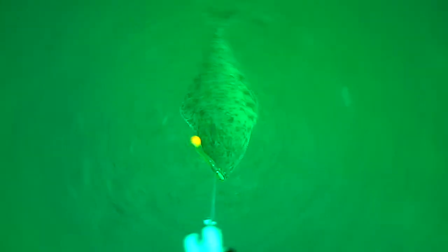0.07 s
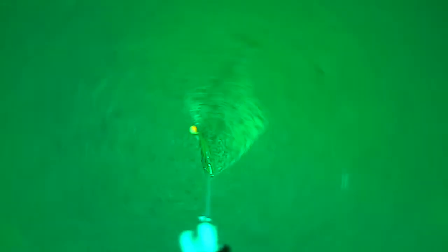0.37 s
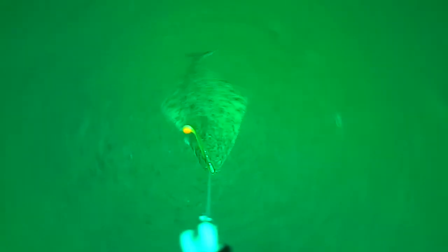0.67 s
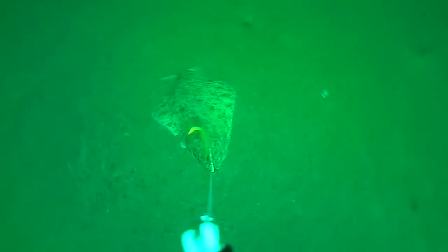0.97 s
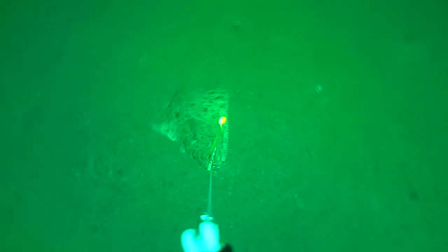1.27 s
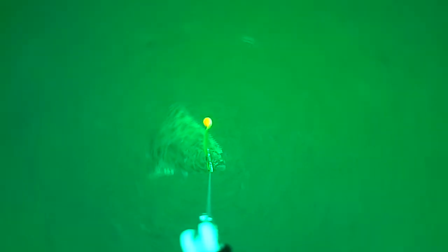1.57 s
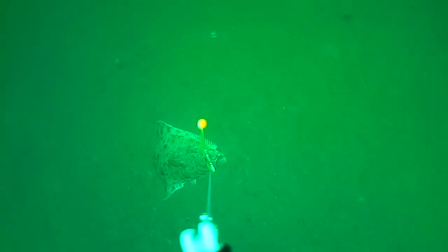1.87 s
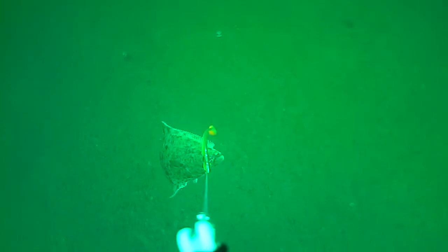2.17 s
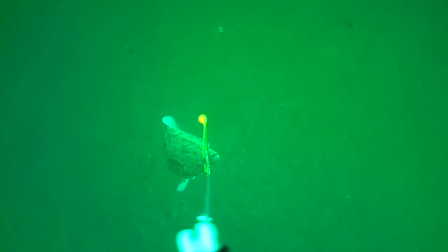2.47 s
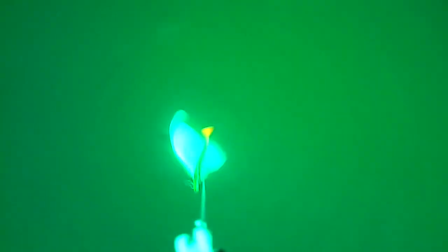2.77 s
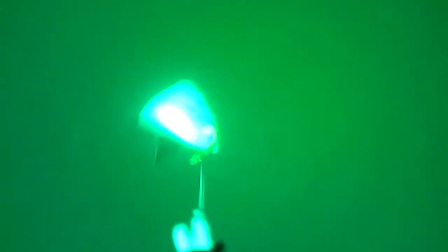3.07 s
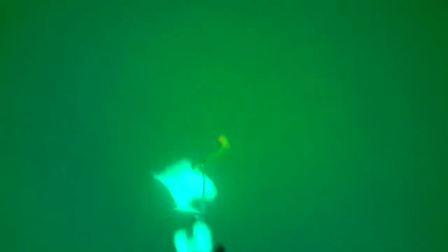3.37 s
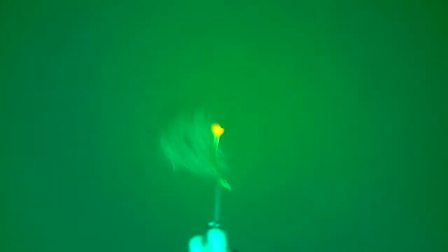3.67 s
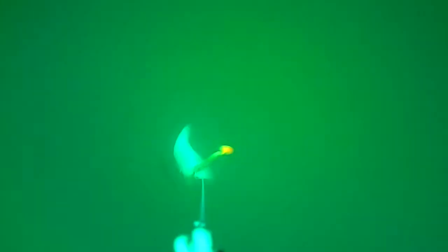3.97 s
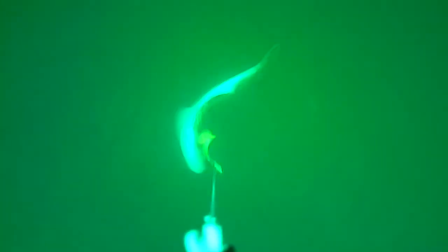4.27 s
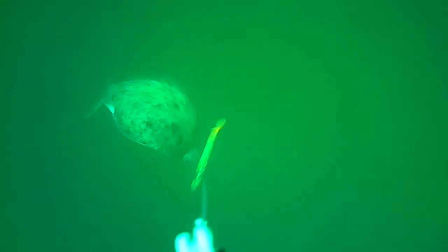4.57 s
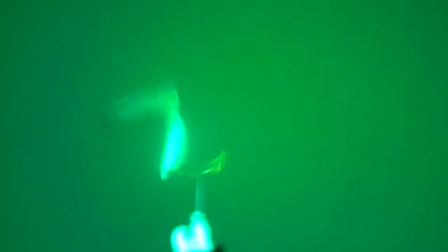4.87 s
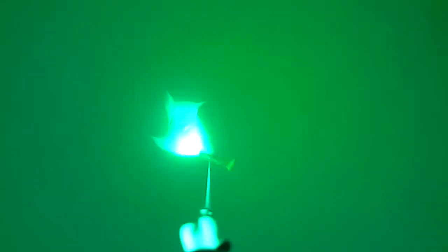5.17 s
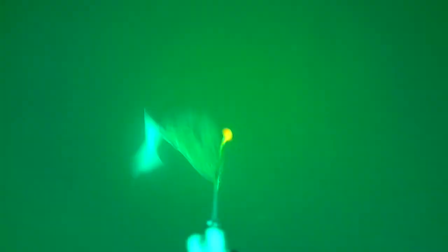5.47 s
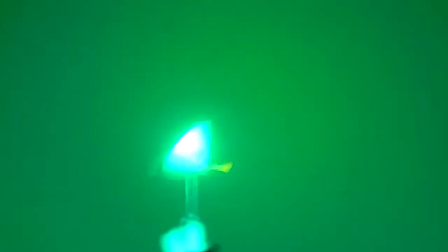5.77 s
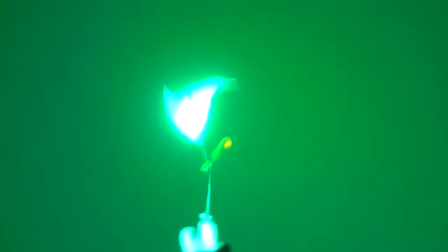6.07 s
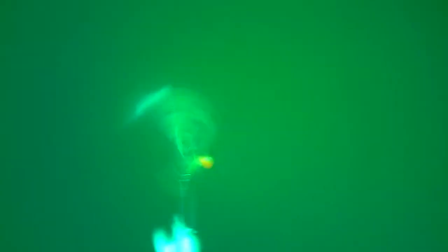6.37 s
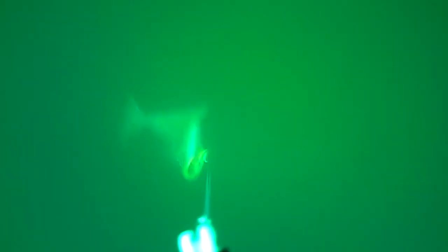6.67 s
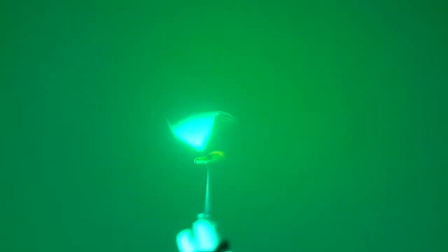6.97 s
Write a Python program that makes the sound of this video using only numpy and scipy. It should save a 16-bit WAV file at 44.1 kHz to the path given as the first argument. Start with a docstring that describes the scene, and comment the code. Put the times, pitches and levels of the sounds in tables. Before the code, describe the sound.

A soft, low rumble of flowing water and faint hiss run throughout, with everything heard close and hollow through an underwater camera housing. In the first second the fishing line creaks and ticks quietly; small clinks and a light thud follow around 1.3 seconds. At 2.1 seconds a knock starts a wavering squeal of hauled line, lasting until about 2.8. From there the taut line hums low and the hooked fish thrashes in short rasping, shuddering bursts, roughly every half second. The metal rig clacks sharply around 3.5, 4.0 and 4.4 seconds, then harder and more densely from 4.7 to 5.4. Brief squeaks come near 3, from 4.3 to 4.7, and from 5.5 to 6.6. Bright metallic snaps ring near 5.0 and 6.5, and tugs give deep thumps near 4.7, 5.8 and 6.7. Loud clacks land at 6.3 and 6.7, with lighter knocks at 7 seconds.

```python
"""Hooked fish on a taut line

A fish thrashes just below an underwater camera tied into the fishing line. Vibration travels along the
line and excites the resonances of the housing: the taut line hums, the metal rig rasps and knocks with
the head shakes, tugs rock the housing, and stick-slip friction makes the line squeal as it is hauled in.
Flowing water rumbles underneath."""
import sys
import numpy as np
from scipy import signal
from scipy.fft import rfft, irfft, next_fast_len
from scipy.io import wavfile
from scipy.ndimage import uniform_filter1d

SR = 44100
rng = np.random.default_rng(int(sys.argv[2]) if len(sys.argv) > 2 else 0)


def store_pcm(level_fs):
    """Save levels as 16-bit WAV."""
    pcm = np.round(np.clip(level_fs, -1, 1) * 32767).astype(np.int16)
    wavfile.write(sys.argv[1], SR, np.atleast_2d(pcm).T)


N = 309582
TIME = np.arange(N) / SR
STEPS = np.arange(0, N + SR // 1000, SR // 1000) / SR   # time grid of the slow controls [s]


def from_db(db):
    """Amplitude ratio of a level in decibels."""
    return 10 ** (np.asarray(db) / 20)


def power_sum(levels_db):
    """Incoherent addition: the powers of independent sources add to one level [dB]."""
    return 10 * np.log10(sum(10 ** (np.maximum(db, -150) / 10) for db in levels_db))


def unit_rms(x):
    """Normalisation to unit mean power."""
    return x / np.sqrt(np.mean(x ** 2) + 1e-20)


def evened(x, span_s):
    """Division by the running RMS holds the power near one and keeps the finer grain."""
    size = max(int(span_s * SR), 8)
    power = uniform_filter1d(uniform_filter1d(x ** 2, size), size)
    return x / np.sqrt(np.abs(power) + 1e-5 * np.mean(x ** 2))


def per_sample(control):
    """Linear interpolation of a slow control to the sample rate."""
    return np.interp(TIME, STEPS, control)


def swell(start_s, hold_s, rise, fall):
    """Exponential growth, hold and decay: level [dB] relative to the top, with slopes in dB/s."""
    return -rise * np.maximum(start_s - STEPS, 0) - fall * np.maximum(STEPS - start_s - hold_s, 0)


def held_levels(rows, rise, fall):
    """Overlapping swells add in power, giving one curve [dB] for each level column."""
    swells = [[swell(s, hold_s, rise, fall) + db for db in levels] for s, hold_s, *levels in rows]
    return [per_sample(power_sum(levels)) for levels in zip(*swells)]


def coloured_noise(spectrum):
    """Spectral shaping of white noise, at unit power."""
    hz, db = np.transpose(spectrum)
    size = next_fast_len(N)
    bin_hz = np.maximum(np.arange(size // 2 + 1) * SR / size, 1)
    gain = from_db(np.interp(np.log(bin_hz), np.log(hz), db))
    return unit_rms(irfft(rfft(rng.standard_normal(size)) * gain, size)[:N])


def drift(rate_hz):
    """Low-passed noise: a smooth random fluctuation of unit RMS."""
    pole = np.exp(-2 * np.pi * rate_hz / SR)
    smooth = signal.lfilter([1], [1, -2 * pole, pole * pole], rng.standard_normal(N + SR))
    return unit_rms(smooth[SR:])


def rolloff(x, order, hz, kind="low"):
    """Maximally flat low-pass or high-pass filter."""
    return signal.sosfilt(signal.butter(order, hz, kind, fs=SR, output="sos"), x)


def ring(x, hz, width_hz):
    """Damped resonator with unit gain at resonance."""
    radius, angle = np.exp(-np.pi * width_hz / SR), 2 * np.pi * hz / SR
    gain = (1 - radius ** 2) * np.sin(angle)
    return signal.lfilter([0, gain], [1, -2 * radius * np.cos(angle), radius ** 2], x + 1e-18)


def resonate(x, modes):
    """Modal superposition: parallel resonators of alternating polarity."""
    return sum((-1) ** k * from_db(db) * ring(x, hz, width) for k, (hz, width, db) in enumerate(modes))


# Strength of the flow round the housing: (time [s], level [dB])
FLOW_LEVEL = [(0.0, -50.5), (0.49, -47.5), (0.72, -51.5), (1.8, -55), (3.01, -42.5), (3.85, -47),
              (5.18, -44.5), (5.38, -48), (6.76, -43.5), (7.02, -41)]
# Spectra of flow noise and microphone hiss: (frequency [Hz], relative level [dB])
FLOW_SPECTRUM = [(12, 3.5), (30, 6), (55, -2.5), (80, -4.5), (130, -11), (300, -54)]
HISS_SPECTRUM = [(59, -38), (100, -13), (270, -23), (306, -2.5), (541, -6.5), (589, -4.5), (2810, -10.5),
                 (4190, -14), (15500, -16)]

def background(eddy_db=1.5, eddy_hz=2.2, hiss_db=-61.5):
    """Flow noise: eddies rumble on the housing, over the steady self-noise of the microphone."""
    flow_db = np.interp(TIME, *np.transpose(FLOW_LEVEL)) + eddy_db * drift(eddy_hz)
    rumble = from_db(flow_db) * evened(coloured_noise(FLOW_SPECTRUM), span_s=0.39)
    return rumble + from_db(hiss_db) * coloured_noise(HISS_SPECTRUM)


# Clinks of the loose swivel, and the rig's metal snapping tight: (time [s], peak level [dB])
SWIVEL_CLINKS = [(1.2191, -48), (1.2949, -49), (1.358, -38), (3.6733, -41), (3.7057, -45), (3.7621, -41),
                 (3.797, -35.5), (6.78, -31), (6.887, -42.5)]
METAL_SNAPS = [(4.975, -20), (5.168, -33.5), (5.828, -28), (6.541, -20), (6.736, -34)]
# Modes of these two parts: (frequency [Hz], bandwidth [Hz], relative gain [dB])
SWIVEL_MODES = [(1910, 370, -19), (2518.5, 180, 22), (3160, 540, -12)]
METAL_MODES = [(3490, 770, -4.5), (4038, 80, 4), (4874, 100, 3.5), (6400, 183.5, -6.5), (7520, 280, -7),
               (9318, 140, -16.5)]

def metal_taps(taps, modes):
    """Impulse response: a small metal part rings freely after each tap."""
    response = resonate(signal.unit_impulse(SR // 10), modes)
    response /= np.abs(response).max()
    out = np.zeros(N + SR)
    for time_s, peak_db in taps:
        start = round(time_s * SR)
        out[start:start + len(response)] += from_db(peak_db) * response
    return out[:N]


# Jolts on the housing: (time [s], relative level [dB], frequency [Hz], 60 dB decay time [s])
TUGS = [(1.545, -39, 46.3, 0.31), (2.93, -32, 28.2, 0.4), (3.325, -21, 41.8, 0.37),
        (4.728, -14.5, 32.17, 0.43), (5.152, -16.5, 29.54, 0.21), (5.77, -13.5, 204.2, 0.098),
        (5.775, -22, 55.17, 0.19), (5.811, -14, 230.1, 0.079), (6.081, -15, 27.3, 0.16),
        (6.562, -26.5, 30.2, 0.23), (6.646, -19.5, 31, 0.35), (6.728, -10, 195, 0.072)]

def tugs(rise_s=0.0084, gain_db=3):
    """Damped oscillation: each jolt rocks the housing for a few cycles."""
    out = np.zeros(N)
    for time_s, db, hz, t60 in TUGS:
        age = np.maximum(TIME - time_s, 0)
        envelope = from_db(db + gain_db - 60 * age / t60) * (1 - np.exp(-age / rise_s))
        out += envelope * np.sin(2 * np.pi * hz * age)
    return out


# Creaks of the line: (start [s], hold [s], relative tick level [dB], relative hum level [dB])
CREAKS = [(.02, 0.098, -45, -41.5), (.175, 0.045, -54, -50), (.31, 0.087, -58, -49.5),
          (.40, .12, -54, -45.5), (.585, 0.025, -62.5, -47), (1.22, 0.18, -65, -71), (2.97, .16, -45, -47),
          (3.205, 0.039, -44, -50), (3.69, 0.079, -58.5, -42.5), (6.66, 0.033, -39, -45),
          (6.83, 0.1115, -56.5, -50.5)]

def creaking():
    """Stick-slip creep of the line over the rig: levels [dB] of its ticking and its hum."""
    return held_levels(CREAKS, rise=600, fall=286)


# Base pitch of the line, low while it creeps and steady once taut: (time [s], frequency [Hz])
LINE_PITCH = [(0, 94.26), (.128, 87.24), (.254, 57), (.8, 53.07), (1.0, 115.7), (2.6, 124.2), (7.02, 120.3)]

def line_cycles(stretch_hz, wander=0.035):
    """Tension raises a string's fundamental; its integral is the phase of the line [cycles]."""
    hz = np.interp(TIME, *np.transpose(LINE_PITCH)) + stretch_hz
    return np.cumsum(hz * (1 + wander * drift(20))) / SR


# Spectrum of the shaken line: (frequency [Hz], relative level [dB])
SHUDDER_SPECTRUM = [(40, -23), (80, 3), (150, 2), (215, -3.5), (300, -7), (430, -24), (700, -6),
                    (1500, -67)]

def vibrating_line(cycles, hum_db, shudder_db, waver_db=4.5):
    """String vibration: three harmonics, buzzier while slack, and a noisy shudder when shaken."""
    hz = np.gradient(cycles) * SR
    db_per_harmonic = np.interp(hz, [60, 120], [-6, -19])
    swing = sum(from_db((k - 1) * db_per_harmonic) * np.sin(2 * np.pi * k * cycles) for k in (1, 2, 3))
    hum = np.sqrt(2) * swing * from_db(hum_db - 1 + waver_db * drift(19))
    shudder = from_db(shudder_db + 1) * evened(coloured_noise(SHUDDER_SPECTRUM), span_s=0.004)
    return hum + shudder


# Hauls: (start [s], hold [s], relative friction level [dB], relative tick level [dB])
HAULS = [(.72, 0.15, -64, -86), (2.11, 1, -38, -59), (4.26, 0.56, -39, -58.5), (5.49, 0.4184, -40.5, -60),
         (6.0, 0.759, -36.5, -54)]

def hauling():
    """Friction of the line being hauled in: levels [dB] of its sliding and of the rig's ticking."""
    return held_levels(HAULS, rise=409, fall=211.5)


# Modes excited by the running line: (frequency [Hz], bandwidth [Hz], relative gain [dB])
SLIDE_MODES = [(544.6, 64, -7.5), (676, 135.7, -0.5), (815, 125, 3.5), (897.6, 65.7, 4), (1142, 18.7, -5),
               (1413, 26, -14), (1670, 114, -18), (1872, 53, -10), (2540, 83, -22.5), (3360, 900, -34)]

def slide(slide_db, grain_db=4.0):
    """Sliding friction: the running line drives the modes with grainy broadband noise."""
    friction = rng.standard_normal(N) * from_db(grain_db * drift(110))
    return from_db(slide_db - 1) * evened(resonate(friction, SLIDE_MODES), span_s=0.024)


# The first, long squeal: (time [s], frequency [Hz])
SQUEAL_GLIDE = [(2.04, 186.2), (2.071, 291.4), (2.11, 448), (2.15, 545), (2.206, 553.6), (2.239, 392.6),
                (2.27, 433), (2.30, 530.9), (2.316, 650.7), (2.35, 727.5), (2.385, 646), (2.43, 680),
                (2.479, 294), (2.52, 599), (2.547, 757), (2.60, 670.4), (2.699, 610), (2.789, 405.3)]
# Its level, broadly rising with pitch: (frequency [Hz], level [dB])
SQUEAL_LEVEL = [(187, -69), (290, -41), (430, -35), (580, -38), (670, -25.5), (740, -24)]
# Short spurts of line: (centre time [s], duration [s], top frequency [Hz], top level [dB])
SPURTS = [(2.865, 0.053, 460, -31.5), (3.033, .07, 739.4, -26), (3.102, .1, 445, -36),
          (4.272, .13, 430, -39.5), (4.38, 0.16, 460, -33.5), (4.538, 0.082, 429, -39),
          (4.611, 0.092, 720, -38), (4.702, 0.079, 399, -41.5), (5.531, 0.15, 405, -34),
          (5.61, .08, 455, -32.5), (5.727, .1, 372, -31.5), (5.987, .11, 450, -35),
          (6.065, 0.079, 415, -40.5), (6.17, 0.095, 420, -36), (6.408, 0.085, 630, -35.5),
          (6.509, .1, 680, -39), (6.589, 0.068, 445, -34)]

def squeal_contour(sag_octaves=0.28, fade_db=11):
    """Pitch [Hz] and level [dB] follow sliding speed: one long run, then spurts that rise and fall."""
    times, glide_hz = np.transpose(SQUEAL_GLIDE)
    hz = np.interp(STEPS, times, glide_hz)
    run_db = swell(times[0], times[-1] - times[0], rise=409, fall=211.5)
    tone_db = np.interp(hz, *np.transpose(SQUEAL_LEVEL)) + run_db
    for centre_s, length_s, top_hz, top_db in SPURTS:
        arch = (2 * (STEPS - centre_s) / length_s) ** 2   # 0 at the centre, 1 at either end
        spurt_db = top_db - fade_db * arch
        spurt_hz = top_hz * 2 ** (-sag_octaves * np.minimum(arch, 2))
        hz = np.where(spurt_db > tone_db, spurt_hz, hz)   # the loudest sets the pitch
        tone_db = np.maximum(tone_db, spurt_db)
    return per_sample(hz), per_sample(tone_db)


def squeal(jitter=0.01528, flutter_db=1.5, db_per_octave=-5):
    """Stick-slip oscillation: each harmonic of the running line stands out as it crosses a mode."""
    hz, tone_db = squeal_contour()
    unsteadiness = np.clip((-tone_db - 20) / 7, .35, 2)   # faint squeals waver more
    phase = 2 * np.pi * np.cumsum(hz * (1 + jitter * unsteadiness * drift(93.5))) / SR
    buzz = sum(from_db(db_per_octave * np.log2(k)) * np.sin(k * phase) for k in range(1, 7))
    tone = evened(resonate(buzz, SLIDE_MODES), span_s=0.037)
    return tone * from_db(tone_db + flutter_db * unsteadiness * drift(45))


# Modes of the housing: (frequency [Hz], bandwidth [Hz], relative gain [dB])
HOUSING_MODES = [(572, 176, -8.5), (663, 100, -5), (1015, 53, -11.5), (1140, 104, -10), (1335, 77, -2),
                 (1572, 173, -2.5), (1686, 70, 3.5), (1939, 143, 4), (2250, 345, -0.5), (2517, 146, -6),
                 (2760, 68, -11.5), (3140, 390, -11), (3555, 470, -8.5), (3780, 290, -18.5),
                 (3860, 34, -58), (4440, 340, -27), (5500, 320, -27), (6270, 870, -48.5), (7300, 290, -32),
                 (9800, 110, -74)]

def housing(clicks, db_per_octave, scatter_db):
    """Modal excitation: each contact strikes every mode of the housing with its own random strength."""
    out, contacts = np.zeros(len(clicks)), np.flatnonzero(clicks)
    for k, (hz, width_hz, db) in enumerate(HOUSING_MODES):
        mode_db = db + db_per_octave * np.log2(hz / 2000)
        force = clicks.copy()
        force[contacts] *= from_db(mode_db + scatter_db * rng.standard_normal(len(contacts)))
        out += (-1) ** k * ring(force, hz, width_hz)
    return out


# Hard contacts of the rig: (time [s], clack level [dB], thud level [dB])
KNOCKS = [(0.0203, -31.5, -54), (.0426, -32.5, -46), (.2, -41, -70), (.411, -38, -70), (0.4295, -39.5, -68),
          (0.496, -36, -66), (1.3574, -40, -30.5), (1.5522, -68, -49), (2.1139, -26, -20),
          (2.7479, -26, -51), (2.9552, -32, -50), (3.3384, -25.5, -39), (3.3945, -23, -48),
          (3.4534, -11.5, -57), (3.534, -23, -53.5), (3.7600, -35.5, -27), (3.9452, -15, -34),
          (3.9599, -18.5, -46), (3.9834, -13, -46), (4.0242, -14, -30), (4.0402, -14.5, -22),
          (4.1186, -23.5, -51), (4.2059, -36.5, -47), (4.4183, -12, -20), (4.7395, -19.5, -33),
          (4.7559, -13, -46.5), (4.769, -21, -22.5), (4.866, -17, -17.5), (4.9319, -9, -29),
          (4.9753, -7, -50), (5.0996, -39, -21), (5.1297, -33.5, -30), (5.1684, -24, -29),
          (5.1906, -21, -26), (5.2809, -14.5, -22), (5.3106, -16.5, -41), (5.3265, -6.5, -40),
          (5.3415, -13, -42), (5.7418, -18.5, -23), (6.046, -30.5, -33), (6.2446, -18, -26.5),
          (6.2986, -8, -20), (6.306, -5, -26), (6.3176, -7.5, -28), (6.3469, -18.5, -28),
          (6.536, -13.5, -18.5), (6.5401, -15, -18.5), (6.7324, -8.5, -45), (6.7353, -7.5, -41),
          (6.985, -32, -32.5), (7.006, -23, -30)]
# Modes of the hollow thud: (frequency [Hz], bandwidth [Hz], relative gain [dB])
THUD_MODES = [(630, 63, -3.5), (767, 77, 0), (881, 37, 5.5), (970, 46, -4), (2600, 17.4, -12)]

def knocks(bounces=7, mean_lag_s=.0016, bounce_db=-1):
    """Impact with rebounds: a quick cluster of impulses rings as a bright clack over a hollow thud."""
    out, size = np.zeros(N + SR), SR // 10
    for time_s, clack_db, thud_db in KNOCKS:
        clicks = np.zeros(size)
        lags = np.minimum(rng.exponential(mean_lag_s * SR, bounces), size - 1).astype(int)
        clicks[lags] = from_db(bounce_db) * rng.uniform(-1, 1, bounces)
        clicks[0] = 1
        clack = housing(clicks, db_per_octave=0.54, scatter_db=3.5)
        thud = resonate(clicks, THUD_MODES)
        start = round(time_s * SR)
        out[start:start + size] += from_db(clack_db) * clack / np.abs(clack).max()
        out[start:start + size] += from_db(thud_db) * thud / np.abs(thud).max()
    return rolloff(out[:N], order=2, hz=10000)   # line and water absorb the highest partials


def scraping(rise=2194, fall=1300):
    """Glancing contact: level [dB] of the rig scraping into and off each knock; slopes in dB/s."""
    level_db, reach = np.full(N, -150.), SR // 10
    for time_s, clack_db, _ in KNOCKS:
        centre = round(time_s * SR)
        near = slice(max(centre - reach, 0), centre + reach)
        age = TIME[near] - time_s
        level_db[near] = np.maximum(level_db[near], clack_db + np.minimum(rise * age, -fall * age))
    return level_db


def rasp(cycles, rasp_db, fizz_db, full_pull_db=-29, slips_per_s=2300, tick_db=5, split_hz=4200):
    """Stick-slip friction: the rig ticks in step with the line and crackles under a hard pull."""
    pull = from_db(np.minimum(rasp_db - full_pull_db, 0))
    release = from_db(5 * np.clip(drift(150), -2, 1.5))   # the rig sticks, then slips in clumps
    slips = rng.random(N) < slips_per_s * release * pull ** 1.5 / SR
    line_hz = np.gradient(cycles) * SR
    tick_chance = np.interp(line_hz, [100, 115], [1, .55])   # a taut line ticks on only some swings
    new_swing = np.diff(np.floor(cycles), prepend=0) > 0
    ticks = new_swing & (rng.random(N) < tick_chance)
    strength = release ** (pull / 2) * from_db(3.5 * np.clip(rng.standard_normal(N), -2, 2))
    clicks = strength * (slips * rng.choice([-1, 1], N) + from_db(tick_db) * ticks)
    body = housing(clicks, db_per_octave=-2, scatter_db=4)
    # light ticks ring only near the rig's own resonance; hard slips reach the whole housing
    low = rolloff(body, order=6, hz=split_hz)
    low = (1 - pull) * ring(low, hz=2050, width_hz=650) + pull * low
    high = rolloff(body, order=6, hz=split_hz, kind="high")
    high = rolloff(high, order=2, hz=7500)
    fizz = from_db(fizz_db - 2) * evened(high, span_s=0.024)
    return from_db(rasp_db - 1) * evened(low, span_s=0.012) + fizz


# Bouts of head shaking, with relative levels: (start [s], hold [s], rise [dB/s], fall [dB/s], rasp [dB],
# fizz [dB], shudder [dB], hum [dB], pitch rise [Hz], recoil delay [s], recoil [dB])
THRASHES = [(2.739, .025, 190, 125, -29, -50, -40, -29.5, 12, 0.091, -22.5),
            (3.425, .18, 200, 320, -32, -49, -36, -34.5, 12.5, 0.09, -41),
            (3.932, 0.13, 600, 300, -27.5, -48, -29.5, -45, 15.6, 0.046, -30.5),
            (4.426, .075, 340, 650, -25, -43.5, -36, -36.5, 45.5, 0.037, -40),
            (4.915, .075, 250, 650, -19, -37, -32, -47.5, 13.5, 0.034, -32),
            (5.278, 0.064, 250, 200, -27.5, -45.5, -30.5, -42.5, 4.06, 0.066, -34),
            (5.744, .09, 399.5, 190, -23, -44.5, -32.5, -38, 34, 0.042, -24),
            (6.259, 0.048, 148, 270, -26.5, -49.5, -33, -41.5, 6, 0.033, -24),
            (6.728, 0.011, 231, 381, -25.5, -49, -33, -36.5, 38, 0.086, -39)]

def thrashing(hum_lead_s=0.018, shudder_lag_s=0.005, stretch_exponent=.6):
    """Forced vibration by the fish: effort, rasp, fizz, shudder and hum [dB], and pitch rise [Hz]."""
    bouts, stretch_hz = [], 0
    for (start_s, hold_s, rise, fall, rasp_db, fizz_db, shudder_db, hum_db,
         pitch_rise_hz, recoil_s, recoil_db) in THRASHES:
        effort = swell(start_s, hold_s, rise, fall)
        shudder = shudder_db + swell(start_s, hold_s + shudder_lag_s, rise, fall=224)
        hum = hum_db + swell(start_s - hum_lead_s, hold_s + hum_lead_s, rise, fall=210)
        # the line rings and shudders again as the fish lets up
        recoil = recoil_db + swell(start_s + hold_s + recoil_s, 0, rise=411, fall=238)
        shudder = power_sum([shudder, recoil - 11.5])
        hum = power_sum([hum, recoil])
        bouts.append((effort, effort + rasp_db, effort + fizz_db, shudder, hum))
        stretch_hz += pitch_rise_hz * from_db(stretch_exponent * effort)
    return [per_sample(power_sum(levels)) for levels in zip(*bouts)], per_sample(stretch_hz)


def scene(taut_from_s=2.6, rest_rasp_db=-76, rest_shudder_db=-67):
    """Superposition of rig, line and water, all heard through one housing."""
    (effort_db, rasp_db, fizz_db, shudder_db, hum_db), stretch_hz = thrashing()
    creak_tick_db, creak_hum_db = creaking()
    haul_db, haul_tick_db = hauling()
    scrape_db = scraping()
    surge_db = 3 * drift(22)   # the pull is uneven within a bout
    ticking_db = power_sum([haul_tick_db, rest_rasp_db]) + 7 * np.tanh(drift(30))   # in clumps
    cycles = line_cycles(stretch_hz)

    rasp_db = power_sum([rasp_db + surge_db, creak_tick_db, ticking_db, scrape_db - 19])
    fizz_db = power_sum([fizz_db + surge_db, scrape_db - 33])
    rig = rasp(cycles, rasp_db, fizz_db) + knocks() + tugs()
    metal = metal_taps(METAL_SNAPS, METAL_MODES) + metal_taps(SWIVEL_CLINKS, SWIVEL_MODES)

    taut_db = -50 - 113 * np.maximum(taut_from_s - TIME, 0)   # a lasting hum once the fish is on
    hum_db = power_sum([taut_db, creak_hum_db, hum_db])
    shudder_db = power_sum([shudder_db, creak_hum_db - 33, rest_shudder_db])
    slide_db = power_sum([haul_db, effort_db - 38])
    line = vibrating_line(cycles, hum_db, shudder_db) + squeal() + slide(slide_db)
    return (rig + metal + line + background())[None]


def record(dry):
    """Band limiting: a steep elliptic low-pass cuts the treble above 15.7 kHz."""
    return signal.sosfilt(signal.ellip(10, .2, 80, 15700, fs=SR, output="sos"), dry)


dry = scene()
out = record(dry)
store_pcm(out)
```